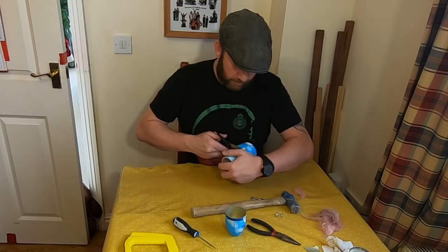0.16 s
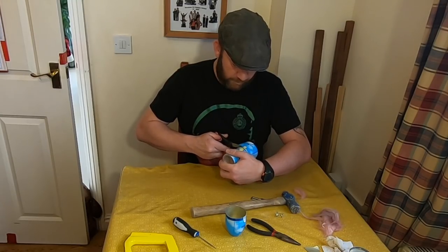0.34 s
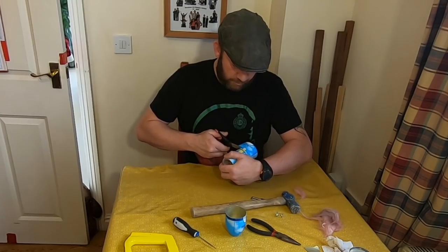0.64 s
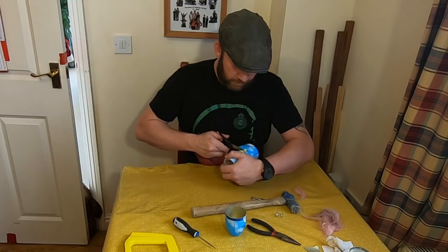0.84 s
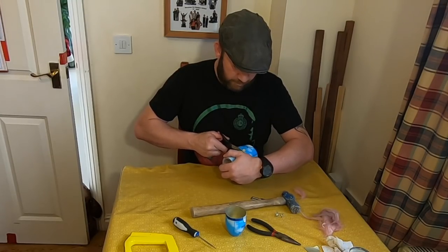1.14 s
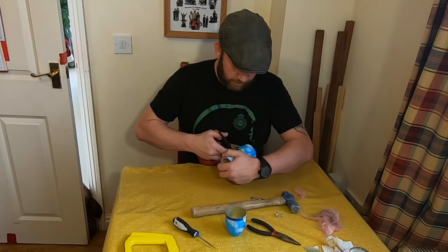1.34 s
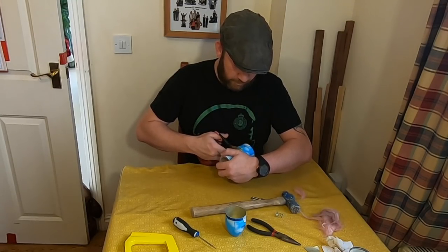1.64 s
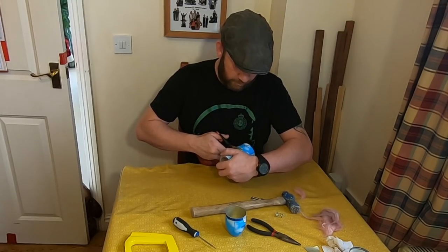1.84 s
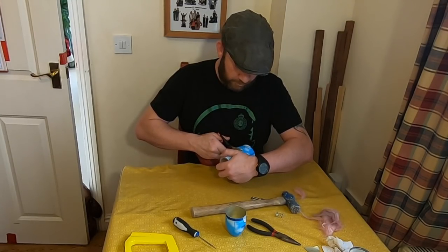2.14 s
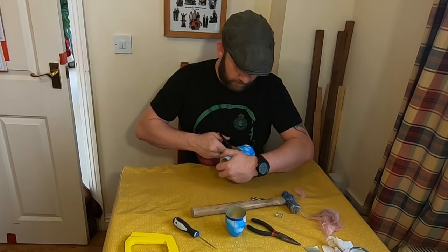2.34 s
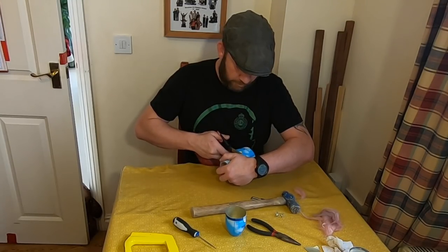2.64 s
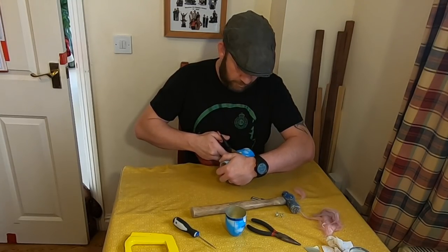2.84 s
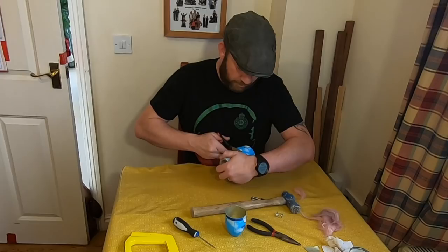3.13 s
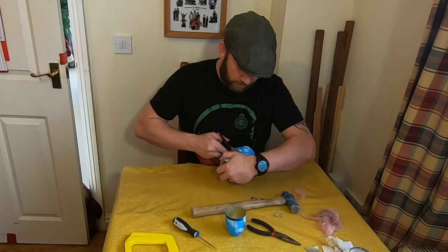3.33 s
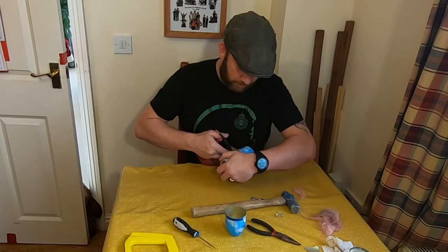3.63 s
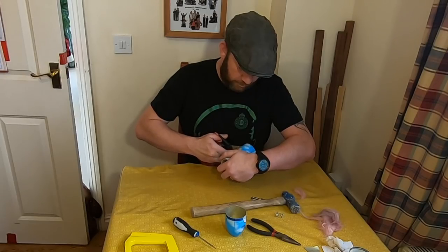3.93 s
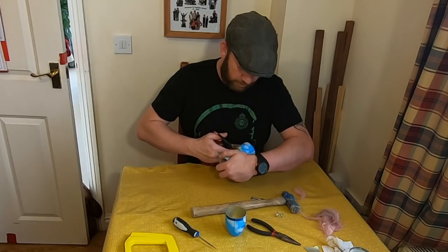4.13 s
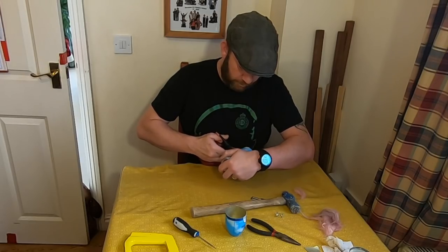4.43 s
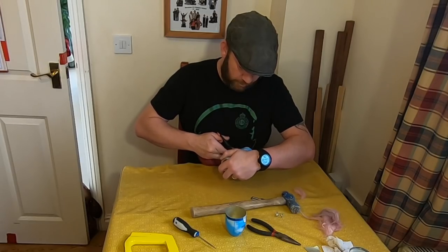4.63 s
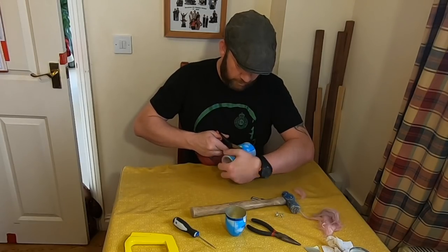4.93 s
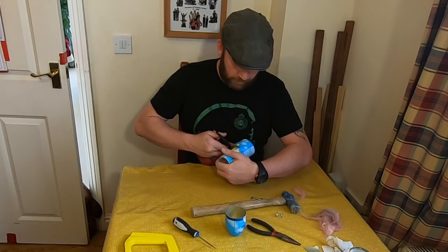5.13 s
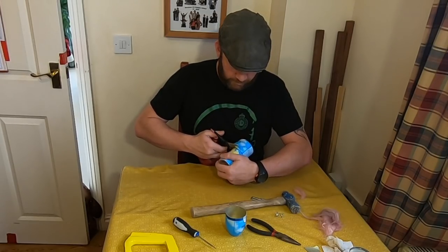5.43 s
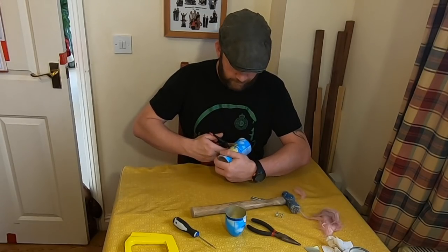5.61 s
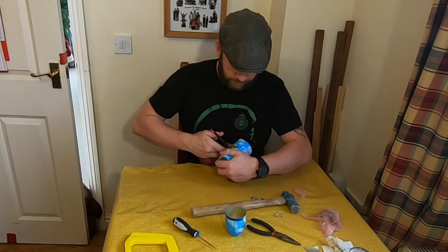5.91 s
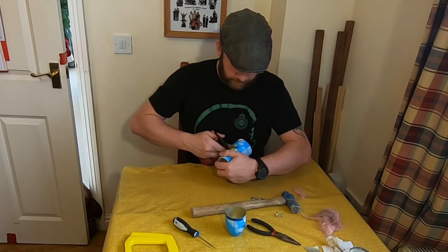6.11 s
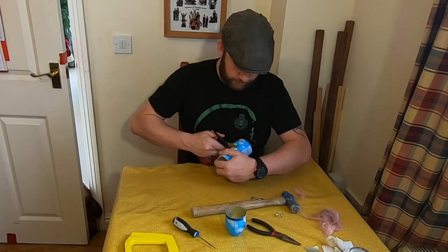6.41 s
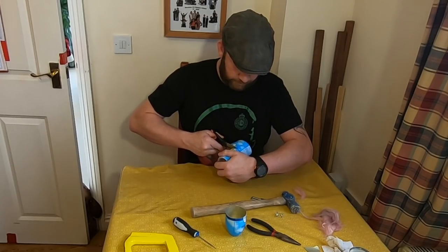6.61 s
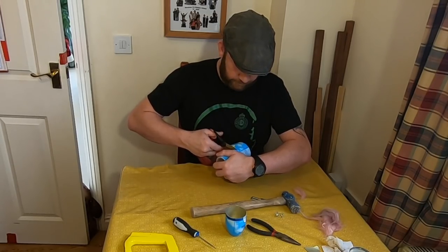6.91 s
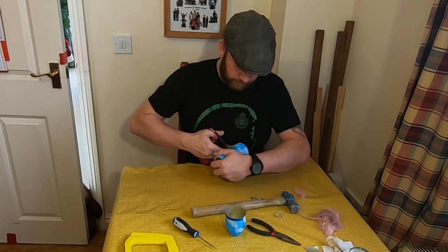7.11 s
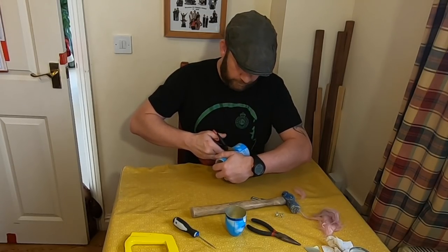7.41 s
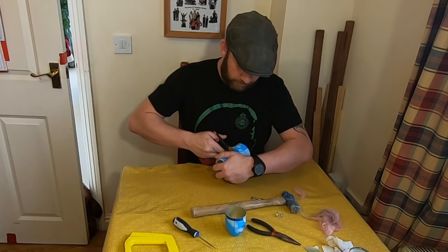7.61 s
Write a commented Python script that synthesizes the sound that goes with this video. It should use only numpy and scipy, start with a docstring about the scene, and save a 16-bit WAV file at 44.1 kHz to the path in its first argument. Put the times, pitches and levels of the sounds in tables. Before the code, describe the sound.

Scissors snip and crunch irregularly through a thin metal can wall, with scrapes, ticks and brief squeals over a low wavering indoor hum.

```python
"""Scissors are forced through the wall of a metal can, at a table in a small room.
Throughout, a low hum wavers in the room's air, and a faint table rumble swells at three leans of the arms.
From the first moments the blades scrape (grainy noise) and bite: bursts of tiny fractures ring the can.
The sheet creaks and ticks before and after each bite. From 1 s to 7 s some cuts also squeal: short rough
tones that sag in pitch. The last scrape and bite come near 7.5 s."""
import sys
import numpy as np
from scipy import signal
from scipy.fft import rfft, irfft, next_fast_len
from scipy.io import wavfile
from scipy.ndimage import map_coordinates

SR = 44100
rng = np.random.default_rng(int(sys.argv[2]) if len(sys.argv) > 2 else 0)


def materialize(psi):
    """Save the field psi as 16-bit PCM at rate SR to the path in sys.argv[1].

    A 1-D psi becomes a single channel; in a 2-D psi each row is a channel.
    """
    bounded = np.clip(np.atleast_2d(psi).T, -1, 1)
    quanta = np.round(bounded * 32767).astype(np.int16)
    wavfile.write(sys.argv[1], SR, quanta)


N = 342216
SPAN = 24000  # samples given to each short sound
T = np.arange(SPAN) / SR  # time within a short sound, s
HZ = np.fft.rfftfreq(SPAN, 1 / SR)  # its frequencies
MIDDLING_DB = -41  # strength of a middling bite


def amp(db):
    """Decibels to gain."""
    return 10 ** (np.asarray(db) / 20)


def unit(x):
    """Scale to rms 1."""
    return x / np.sqrt(np.mean(x ** 2) + 1e-20)


def burst(x):
    """Scale each channel to the energy of 30 ms at rms 1."""
    energy = np.sum(x ** 2, axis=-1, keepdims=True)
    return x / np.sqrt(energy / (.03 * SR) + 1e-20)


def along(points, hz):
    """Read a curve of (Hz, value) points on a log frequency axis."""
    f, v = np.transpose(points)
    return np.interp(np.log(hz + 1), np.log(f + 1), v)


def wobble(rate, size):
    """A smooth random curve, with rate knots a second."""
    knots = rng.standard_normal(int(size * rate / SR) + 4)
    return map_coordinates(knots, [np.arange(size) * rate / SR])


def causal(db):
    """The minimum-phase response with this gain on the HZ grid: nothing sounds before its cause."""
    cepstrum = irfft(np.log(amp(db) + 1e-6))
    cepstrum[1:SPAN // 2] *= 2
    cepstrum[SPAN // 2 + 1:] = 0
    return np.exp(rfft(cepstrum))


def pair(spectrum, alike, size):
    """Stereo noise of rms 1 with a colour and a left-right likeness, mixed from a middle and a side."""
    m = next_fast_len(size)
    hz = np.fft.rfftfreq(m, 1 / SR)
    turn = np.arccos(np.clip(along(alike, hz), -1, 1)) / 2
    noise = rfft(rng.standard_normal((2, m))) * amp(along(spectrum, hz))
    mid, side = irfft(noise * [np.cos(turn), np.sin(turn)], m)[:, :size]
    return unit(np.array([mid + side, mid - side]))


def add(track, s, sound):
    """Mix a stereo sound in at a time in seconds."""
    start = max(round(s * SR), 0)
    track[:, start:start + SPAN] += sound[:, :N - start]


def stroke(length, rise):
    """Pressure builds smoothly for a share of the stroke and lets go."""
    return np.sin(np.pi / 2 * np.interp(T / length, [0, rise, 1], [0, 1, 0])) ** 2


# How long echoes last. Each row: frequency in Hz, time to fade by 60 dB in seconds.
ECHO_TIMES = [(200, 0.33), (800, 0.42), (2500, 0.39), (6000, 0.36), (10000, 0.33), (15000, 0.19)]
# How alike the echoes are left and right.
# Each row: frequency in Hz, likeness from -1 (opposite) to 1 (same).
ECHO_LIKENESS = [(250, 0.77), (650, 0.57), (1400, 0.088), (3000, 0.62), (6500, 0.79), (14000, -1)]


def room(wet_db=-2.0, walls_db=-2.5, first=0.0022, last=.024, build=0.0083):
    """Response of the room: the direct path, near walls and table, then a diffuse tail (times in s)."""
    noise = pair([(100, 0)], ECHO_LIKENESS, size=SPAN)
    hz, t, z = signal.stft(noise, SR, nperseg=256)
    fading = z * amp(-60 * t / along(ECHO_TIMES, hz)[:, None])
    tail = signal.istft(fading, SR, nperseg=256)[1][:, :SPAN]
    tail *= 1 - np.exp(-T / build)
    walls = np.zeros((2, SPAN))
    delays = rng.uniform(first, last, size=9)
    skews = rng.integers(-2, 3, size=9)  # samples, opposite in the two channels
    for delay, skew in zip(delays, skews):
        walls[[0, 1], [int(delay * SR) + skew, int(delay * SR) - skew]] += np.exp(-delay / last)
    tail = amp(wet_db) * tail / np.linalg.norm(tail[0])
    walls = amp(walls_db) * walls / np.linalg.norm(walls[0])
    return 1 + rfft(tail + walls)  # the 1 is the direct path


# Colour of the room's steady air. Each row: frequency in Hz, relative level in dB per Hz.
AIR_COLOUR = [(20, -22), (60, -29), (105, -29), (165, -2), (240, 0), (320, -4.5), (470, -7.5), (600, -15.5),
              (800, -16), (1100, -22), (2500, -31), (5000, -36.5), (8500, -40), (14000, -63)]
# How alike the air is left and right. Each row: frequency in Hz, likeness from -1 to 1.
AIR_LIKENESS = [(30, 0.26), (200, 0.79), (600, 0.29), (2000, .45), (10000, .3)]
# Tones of the hum. Each row: frequency in Hz, level in dB, unsteadiness (0 is a steady tone).
HUM_TONES = [(215.5, -53.5, 0.21), (165.3, -74, .9), (408, -72, .7)]
AIR_DB = -56.5


def background(waver_rate=14):
    """A hum whose tones waver randomly in strength and phase, over the noise of the room's air."""
    t = np.arange(N) / SR
    hum = 0
    for hz, db, unsteady in HUM_TONES:
        swell = 1 + unsteady * (wobble(waver_rate, size=N) + 1j * wobble(waver_rate, size=N))
        tone = np.real(swell * np.exp(2j * np.pi * hz * t))
        hum = hum + amp(db) * unit(tone)
    return hum + amp(AIR_DB) * pair(AIR_COLOUR, AIR_LIKENESS, size=N)


# Colour of the table's rumble. Each row: frequency in Hz, relative level in dB per Hz.
RUMBLE_COLOUR = [(12, -14.5), (28, -1), (40, -12), (60, -18), (120, -33), (400, -120)]
# The arms lean on the table. Each row: start in seconds, length in seconds, added rumble in dB.
ARM_LEANS = [(2.85, 0.55, -59), (3.893, 0.12, -63), (4.95, 0.53, -56)]
REST_DB = -78.5  # rumble between the leans


def table():
    """The table rumbles faintly and swells whenever the arms lean on it."""
    weight = np.full((2, N), amp(REST_DB))
    for s, length, db in ARM_LEANS:
        lean = amp(db) * stroke(length, 0.61)
        add(weight, s, np.tile(lean, (2, 1)))
    return weight * pair(RUMBLE_COLOUR, [(30, 0.91)], size=N)


STRAIN_DB, STRAIN_GROWS = -60.5, 0.5  # creaking at a middling bite; dB more per dB of bite
LOAD_S, SETTLE_S = 0.047, 0.1  # the sheet is loaded before a bite and settles after it


def strain(spiky_db=7, grain_rate=260):
    """The sheet creaks and ticks faintly as the blades load it, and again as it settles."""
    t = np.arange(N) / SR
    load = np.zeros(N)
    for s, db, *_ in BITES:
        nearness = np.exp(-np.abs(t - s) / np.where(t < s, LOAD_S, SETTLE_S))
        creak_db = STRAIN_DB + STRAIN_GROWS * (db - MIDDLING_DB)
        load = np.maximum(load, amp(creak_db) * nearness)
    ticks = unit(rng.standard_normal(N) * amp(spiky_db * wobble(grain_rate, size=N)))
    response = irfft(causal(along(FRACTURE_COLOUR, HZ)) * room())
    response /= np.linalg.norm(response[0])
    return signal.fftconvolve((load * ticks)[None], response, axes=1)[:, :N]


# Steel slides on the cut edge, and narrow bands of the can ring out. Each row: start in seconds, # length in
# seconds, level in dB, centre of the band in Hz, width of the band in octaves.
SCRAPES_AND_RINGS = [(0, 0.025, -56, 1890, 1.46), (0.125, 0.028, -53.5, 1900, 1.3),
                     (0.148, 0.018, -38.5, 1770, 0.48), (0.143, 0.012, -27.5, 7230, .19),
                     (.43, 0.85, -52, 1900, 1.6), (0.832, 0.011, -46, 3500, 0.053),
                     (1.006, 0.069, -45, 1400, 0.15), (1.331, .036, -38, 2110, 0.15),
                     (1.332, 0.066, -40, 2600, 1.5), (1.429, 0.097, -45, 2460, 1.6),
                     (2.536, .019, -37.5, 6000, .16), (2.533, .018, -31, 777, 0.23),
                     (2.571, 0.036, -42.5, 924, 0.48), (3.615, 0.072, -40.5, 1190, 2.15),
                     (3.66, 0.049, -38, 4660, 1.7), (4.87, 0.2, -52.5, 3830, 1.75),
                     (5.241, 0.036, -28.5, 5580, 0.54), (5.525, 0.11, -40, 1400, 0.91),
                     (5.529, 0.089, -45.5, 6350, 0.65), (6.49, 0.067, -43, 2400, 4.9),
                     (6.965, 0.14, -46, 3980, 2.1), (7.001, 0.012, -36, 12300, 0.82),
                     (7.055, 0.02, -30, 9100, 0.6), (7.049, 0.02, -32, 2120, 0.14),
                     (7.066, 0.12, -43.5, 2130, 0.32), (7.057, .09, -30.5, 850, 0.17),
                     (7.484, 0.17, -58.5, 3960, 2.7)]
# Colour of sliding steel. Each row: frequency in Hz, relative level in dB per Hz.
SLIDE_COLOUR = [(100, -17.5), (500, 0.5), (1000, 0.5), (5000, -4), (9000, -5), (13000, -17.5),
                (15500, -30.5)]


def scrapes_and_rings(grain_db=4, grain_rate=700, skirt_db=-27):
    """Grainy friction of the blade on the sheet, and short narrow rings of the can, each coloured by its band."""
    out = np.zeros((2, N))
    for s, length, db, centre_hz, width in SCRAPES_AND_RINGS:
        grains = rng.standard_normal(SPAN) * amp(grain_db * wobble(grain_rate, size=SPAN))
        friction = grains * stroke(length, 0.24)  # a quarter of each sound is spent swelling
        octaves = np.log2((HZ + 1) / centre_hz)
        band = np.exp(-(octaves / width) ** 2 / 2) + amp(skirt_db)
        colour = causal(20 * np.log10(band) + along(SLIDE_COLOUR, HZ))
        add(out, s, amp(db) * burst(irfft(rfft(friction) * colour * room())))
    return out


# The blades stick and slip. Each row: start in seconds, length in seconds, starting pitch in Hz,
# share of the pitch lost by the end, level in dB before the shared boost,
# second partial in dB against the first.
BLADE_SQUEALS = [(1.001, 0.045, 1520, 0.165, -57.5, -29), (1.378, 0.043, 902, 0.031, -29, -17),
                 (1.45, 0.081, 867, 0.073, -36, -11), (1.46, 0.072, 450.7, 0.064, -37.5, -17),
                 (2.999, 0.074, 2024, 0.0053, -23, -5.5), (3.618, 0.044, 1079, 0.028, -40.5, -26),
                 (3.654, 0.0338, 1077, 0.051, -31, 3), (3.672, 0.039, 1015, 0.056, -27.5, -6),
                 (6.421, 0.033, 929.5, 0.094, -34, -28), (6.488, 0.083, 870, .005, -36, -34),
                 (7.082, 0.038, 745, 0.064, -28.5, -17)]
ROUGH_AT_1K, ROUGH_FALLS = .024, 2.1  # slow slips are rough, fast ones lock into a clean tone
SQUEAL_RISE = 0.63  # share of a squeal spent swelling
THIRD_DB, SLOPE_DB = -12, -5.0  # third partial against the second; then the step per partial


def squeals(boost_db=2.5, jitter_rate=420, flutter=0.049, rasp_db=-24):
    """Stick-slip between blade and sheet: a short rough tone that sags in pitch and hangs in the room."""
    out = np.zeros((2, N))
    for s, length, hz, sag, db, overtones_db in BLADE_SQUEALS:
        rough = ROUGH_AT_1K * (1000 / hz) ** ROUGH_FALLS
        sagging = hz * (1 - sag * np.minimum(T / length, 1))
        pitch = sagging * (1 + rough * wobble(jitter_rate, size=SPAN))
        phase = 2 * np.pi * np.cumsum(pitch) / SR
        grip = stroke(length, SQUEAL_RISE) * np.abs(1 + flutter * wobble(jitter_rate, size=SPAN))
        space = room(wet_db=-3.0)

        def heard(x):
            """The sound in the room, at a set energy."""
            return burst(irfft(rfft(x) * space))

        levels = [0, overtones_db] + [overtones_db + THIRD_DB + SLOPE_DB * k for k in range(5)]
        tone = 0
        for k, level in enumerate(levels, 1):
            # overtones need more pressure than the fundamental
            tone = tone + amp(level) * heard(grip ** np.sqrt(k) * np.sin(k * phase))
        rasp = amp(rasp_db) * heard(grip * pair(SLIDE_COLOUR, ECHO_LIKENESS, size=SPAN)[0])
        add(out, s, amp(db + boost_db) * (tone + rasp))
    return out


# The blades bite. Each row: start in seconds, relative strength in dB, brightness in dB,
# pitch of the can wall in Hz, build-up of the tear in seconds.
BITES = [(0.1445, -39.5, -6, 652, 0.0015), (0.1514, -42, -3, 617, 0.0015), (0.318, -60, -2, 744, 0.0079),
         (0.486, -54, -10.5, 750, 0.0014), (0.5268, -54.5, -4.5, 734, 0.00043),
         (0.7241, -61.5, -1.5, 703, .001), (0.7519, -53, -4, 736, 0.00075),
         (0.8375, -39.5, -1.5, 638, 0.0049), (1.0247, -59, 1, 815, 0.00081),
         (1.13, -45.5, -11.5, 677, 0.013), (1.383, -36.5, 4, 910, 0.011), (1.501, -31, -7, 840, .008),
         (1.553, -41, -18, 820, 0.00034), (2.397, -40.5, -12, 1004, 0.001),
         (2.5343, -31.5, -8, 750, 0.0014), (3.266, -37.5, -6.5, 835, 0.0061),
         (3.4142, -55, -7.5, 872, 0.0013), (3.522, -48, -3, 1170, 0.0094), (3.678, -53.5, 15.5, 914, 0.016),
         (4.069, -34.5, 1, 706, 0.0047), (4.272, -45, -13, 780, 0.0156), (4.518, -42.5, -1.5, 888, 0.0065),
         (4.9218, -48, -6.5, 772, 0.0016), (5.2435, -35, 6.5, 836, 0.0023),
         (5.263, -40.5, 3.5, 876, 0.0086), (5.615, -45, -13, 664, .0006), (5.734, -50.5, -28, 715, .0006),
         (5.785, -72, -15, 670, 0.0011), (5.8376, -62.5, 1, 813, 0.0017), (5.857, -62, 4, 770, .0006),
         (6.4285, -30.5, -11.5, 866, 0.0029), (6.489, -31, -17.5, 820, 0.001354),
         (6.626, -44.5, -5.5, 890, 0.005), (6.712, -46.5, -9, 705, 0.013), (6.7635, -38, -8, 994, 0.0013),
         (6.934, -43.5, 2.5, 776, 0.0031), (7.0515, -30, -0.5, 700, .002),
         (7.5885, -53.5, -7.5, 885, 0.00076)]
# Colour of a fracture. Each row: frequency in Hz, relative level in dB per Hz.
FRACTURE_COLOUR = [(60, -42.5), (150, -28.5), (330, -15.5), (520, -8), (800, -1.5), (1200, -7.5),
                   (2200, -4.5), (3200, -9), (4800, -6.5), (6500, -10), (9000, -10.5), (11000, -24.5),
                   (13000, -33.5), (15500, -41.5)]
# Upper modes of the can. Each row: typical frequency in Hz, typical relative level in dB,
# time to fade by 60 dB in seconds.
CAN_MODES = [(884, 11.5, 0.044), (1468, 4, 0.12), (1600, -1.5, 0.064), (2138, 2.5, .14), (2303, -3, 0.17),
             (3603, 5, 0.11), (5200, 0.5, 0.029), (5930, -11.5, 0.14)]
# the wall's ring at a middling bite; the grip damps it, so it grows less than the bite
RING_DB, RING_GROWS = -48.5, 0.4
EDGE_DB, TEAR_S = -3.5, 0.0043  # a tear's top treble lies under its crunch; every tear runs out equally fast


def snips(crack_db=12.5, modes_db=-3.0, wall_t60=0.078, spiky_db=4.0, crackle_db=-17, crackle_time=0.025):
    """The sheet tears in a run of tiny fractures, which also ring the can."""
    out = np.zeros((2, N))
    fracture = causal(along(FRACTURE_COLOUR, HZ))
    for s, body_db, bright_db, wall_hz, build in BITES:
        crunch_db = body_db + bright_db
        ring_db = RING_DB + RING_GROWS * (body_db - MIDDLING_DB)
        # the tear gathers speed and runs out; the bent edge crackles a little longer
        tear = np.exp(-np.maximum(T - build, 0) / TEAR_S)
        tear += amp(crackle_db) * np.exp(-T / crackle_time)
        tear *= np.minimum(T / build, 1)

        def lip():
            """One lip of the cut crackles by itself and radiates in its own direction."""
            grains = rng.standard_normal(SPAN) * amp(spiky_db * wobble(2500, size=SPAN))
            return rfft(burst(grains * tear)) * room()

        force = fracture * (lip() + lip()) / np.sqrt(2)

        def ring(x):
            """The fractures set a ringing part of the can going."""
            return burst(irfft(rfft(x) * force))

        colour = along([(800, body_db), (2400, crunch_db), (6500, crunch_db + EDGE_DB)], HZ)
        crack = amp(crack_db) * irfft(force * causal(colour))
        wall = np.sin(2 * np.pi * wall_hz * T) * amp(-60 * T / wall_t60)
        # the modes shift with the grip and the length of the cut
        modes = 0
        for hz, db, t60 in CAN_MODES:
            decay = amp(db + 2 * rng.standard_normal() - 60 * T / t60)
            modes = modes + decay * np.sin(2 * np.pi * hz * rng.normal(1, .012) * T)
        add(out, s, crack + amp(ring_db) * ring(wall) + amp(crunch_db + modes_db) * ring(modes))
    return out


def scene():
    """The cutting over the sound of the room."""
    return background() + table() + strain() + scrapes_and_rings() + squeals() + snips()


# The two microphone ports resonate apart. Each row: frequency in Hz, lead of the left in radians.
PORT_LEADS = [(6500, 0), (8500, 3), (9500, 4.5), (10500, 8.5)]
TOP_HZ = 15200  # band limit


def record(dry):
    """The two ports turn the treble's phase apart; nothing is kept above the band limit."""
    m = next_fast_len(N + SPAN)
    hz = np.fft.rfftfreq(m, 1 / SR)
    ports = np.exp(1j * along(PORT_LEADS, hz) / 2 * [[1], [-1]])
    return irfft(rfft(dry, m) * ports * (hz < TOP_HZ), m)[:, :N]


dry = scene()
out = record(dry)
materialize(out)
```